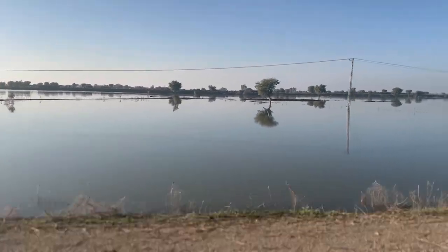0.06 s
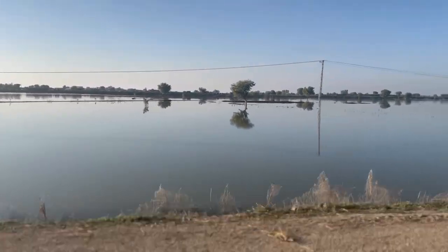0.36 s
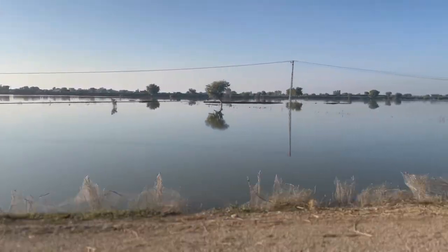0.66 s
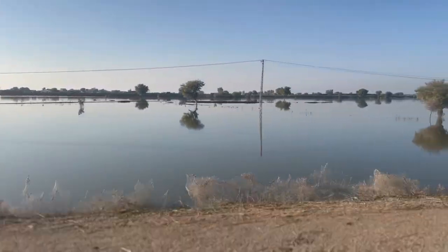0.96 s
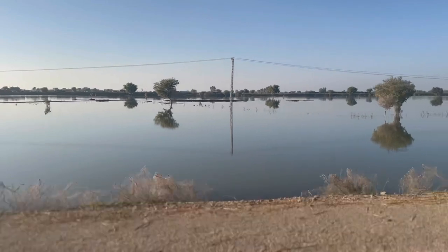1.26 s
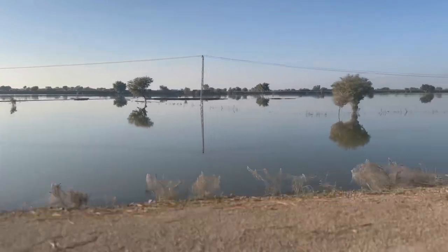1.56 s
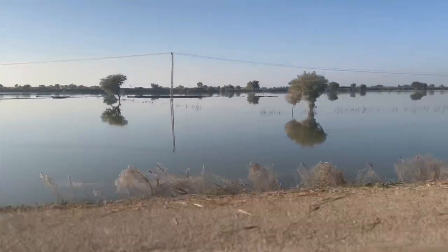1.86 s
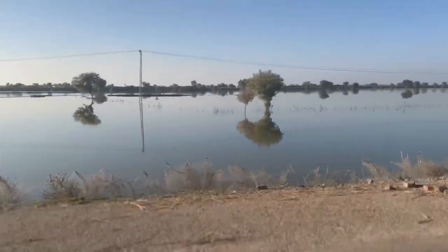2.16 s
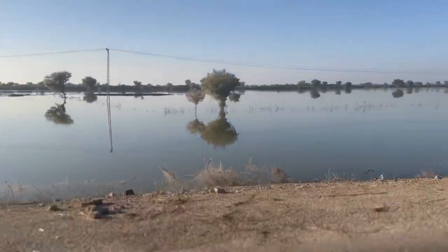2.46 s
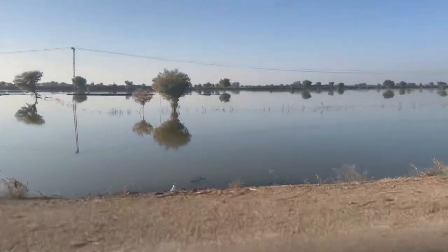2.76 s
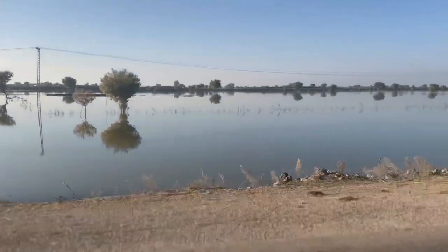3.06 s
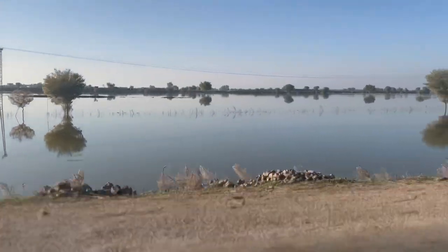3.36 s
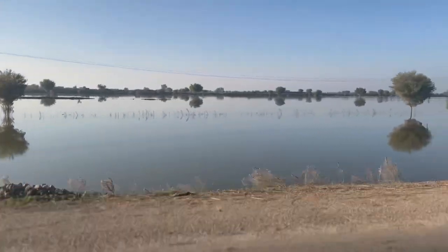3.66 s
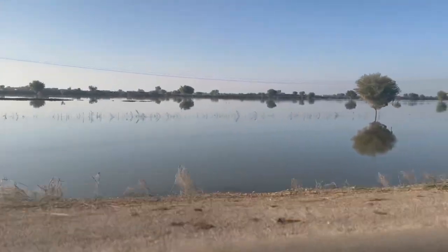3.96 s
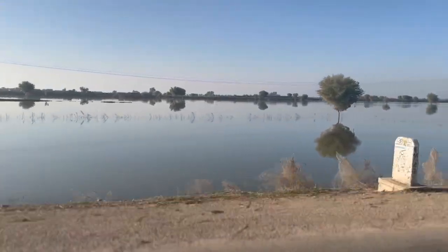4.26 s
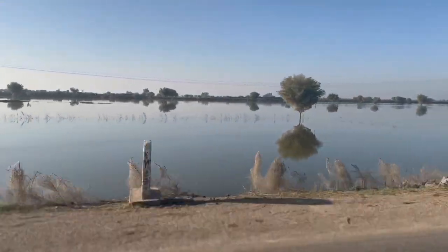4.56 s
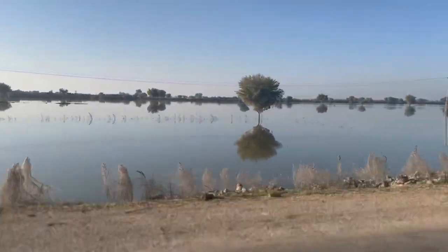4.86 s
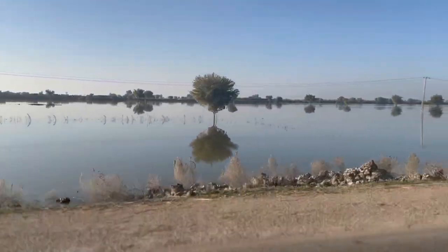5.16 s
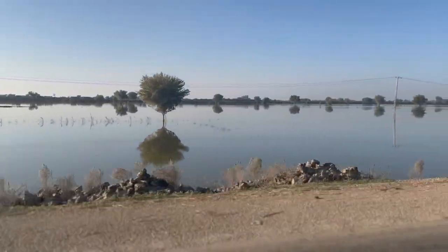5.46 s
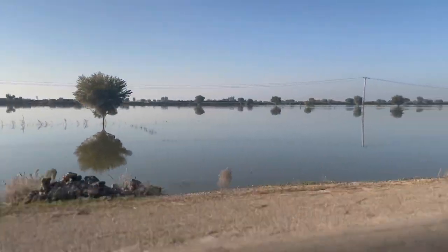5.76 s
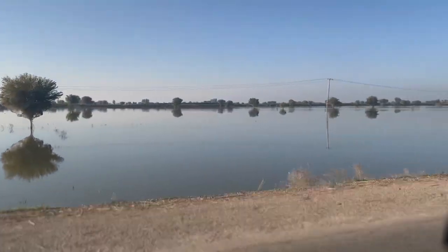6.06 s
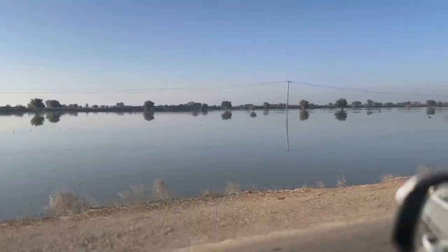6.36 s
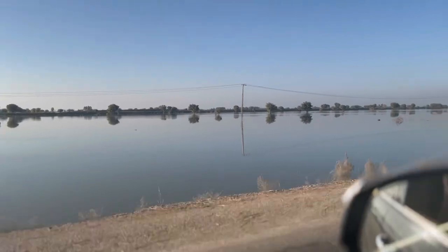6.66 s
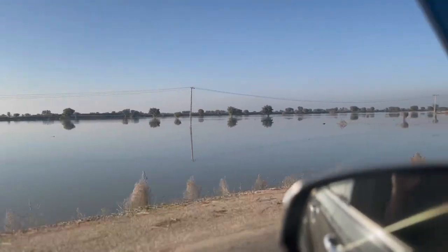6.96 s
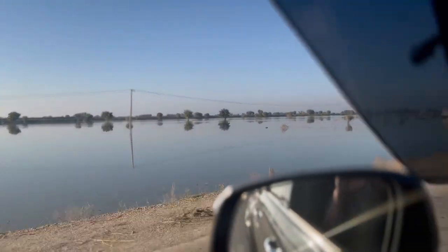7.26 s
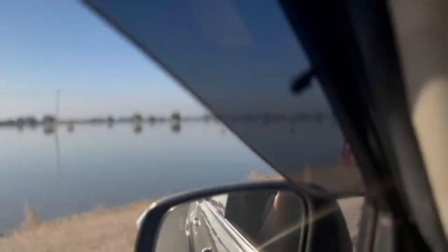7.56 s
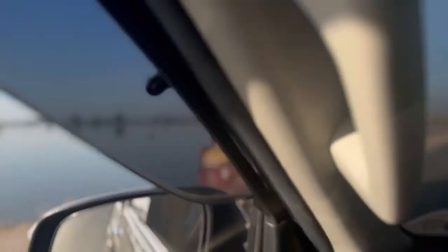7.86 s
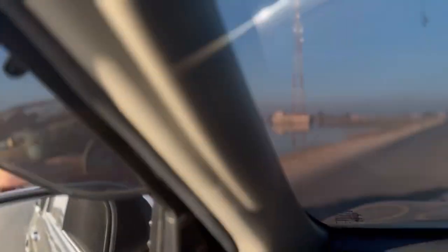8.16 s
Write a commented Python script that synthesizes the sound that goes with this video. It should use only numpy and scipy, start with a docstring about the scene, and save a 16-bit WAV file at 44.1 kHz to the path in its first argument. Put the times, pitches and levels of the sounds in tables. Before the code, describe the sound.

A car drives along a road for about eight seconds, heard from the seat beside an open side window. From the start, tyres roar steadily, the engine hums low and air throbs in and out of the window with a deep rumble. Irregular gusts thump and flutter on the microphone, the hardest with a sharp crack, slightly to the left. The buffeting is strongest from about 1.5 to 5 seconds, and the wind drops away briefly several times, for instance around 0.5, 2 and 5.5 seconds. Near 7 seconds the microphone turns inward and the gusts stop striking it, leaving a few soft, deep thumps. From about 7.3 seconds the engine grows louder and an oncoming lorry draws near, towards the left: first a rough, slightly rising whine, then a drone and tyre hiss that swell until the end at about 8.3 seconds.

```python
"""A car drives along an embankment road, heard from the seat by an open side window.
From the start, tyres roar, the engine hums and air throbs in and out of the window. Eddies (swirls
of air) thump on the microphone, the hardest with a crack, and the wind drops away now and then.
Near seven seconds the microphone turns in from the window and the eddies stop hitting it.
At the end the engine grows louder and an oncoming lorry draws near: first a whine, then drone and hiss."""
import sys
import numpy as np
from scipy import signal
from scipy.fft import rfft, irfft, next_fast_len
from scipy.io import wavfile
from scipy.ndimage import uniform_filter1d, minimum_filter1d

SR = 44100
rng = np.random.default_rng(int(sys.argv[2]) if len(sys.argv) > 2 else 0)


def pcm_store(signal):
    """Save signal as 16-bit PCM."""
    levels = np.round(np.clip(np.atleast_2d(signal), -1, 1) * 32767)
    wavfile.write(sys.argv[1], SR, levels.astype(np.int16).T)


N = 366471
TIME = np.arange(N) / SR
EDDIES_END_S = 6.7   # the microphone turns in from the window

# Strength of the churning air between gusts. Each row: time in seconds, level in dB.
FLUTTER_LEVEL = [(0, -38), (.4, -32), (.55, -33), (.8, -28.5), (1.5, -28.5), (2.0, -26.5), (2.6, -25.5),
                 (3.3, -27), (4.3, -29.5), (5.0, -37), (5.6, -33.5), (6.8, -34), (8.31, -33)]
# How the microphone's two openings, its ports, differ.
# Each row: frequency in Hz, how alike they sound (1 is the same), left minus right in dB.
MIC_PORTS = [(60, .87, 2.2), (200, .84, 0), (350, .82, .3), (520, .7, 4), (770, .62, 4), (1170, .65, 2.5),
             (1790, .5, 1), (2740, .1, -.8), (4200, .1, 1), (6400, .07, 6), (9800, .35, -1),
             (13000, .65, 0)]


def from_db(db):
    """Turn decibels into a gain, the number a sound is multiplied by."""
    return np.exp(np.asarray(db) * (np.log(10) / 20))


def rms_one(x):
    """Scale a signal so that its average power is 1."""
    return x / np.sqrt(np.mean(x ** 2) + 1e-20)


def gain_curve(rows):
    """A gain for every sample, from rows of time in seconds and level in dB."""
    return from_db(np.interp(TIME, *np.transpose(rows)))


def at_hz(points, hz, column=1):
    """Read between a table's rows at a frequency, giving each octave equal room."""
    table = np.array(points)
    return np.interp(np.log(hz + 1e-9), np.log(table[:, 0]), table[:, column])


def drift(rate):
    """A random wander, about 1 in size, that takes a new direction rate times a second."""
    targets = rng.standard_normal(4096)
    return np.interp(TIME * rate, np.arange(len(targets)), targets)


def held(db, fall_db_per_s):
    """A level that jumps up at once and sinks at a set rate."""
    return np.maximum.accumulate(db + fall_db_per_s * TIME) - fall_db_per_s * TIME


def bump(s, width_s):
    """A smooth swell of height 1 around second s."""
    out = np.zeros(N)
    near = slice(*np.searchsorted(TIME, [s - 4 * width_s, s + 4 * width_s]))
    out[near] = np.exp(-((TIME[near] - s) / width_s) ** 2)
    return out


def tone(hz, waver, rate):
    """A pure tone whose pitch wanders by about the fraction waver."""
    wandering_hz = hz * (1 + waver * drift(rate))
    return np.sqrt(2) * np.sin(2 * np.pi * np.cumsum(wandering_hz) / SR)


def stereo(mid, side, alike, pan_db):
    """Mix two unrelated signals into left and right; a positive pan_db favours the left."""
    alike = np.clip(alike, -1, 1)
    mid, side = np.sqrt((1 + alike) / 2) * mid, np.sqrt((1 - alike) / 2) * side
    return np.array([(mid + side) * from_db(pan_db / 2), (mid - side) * from_db(-pan_db / 2)])


def air_noise(spectrum, left_lag_s=0):
    """Noise of power 1 with a given spectrum (its mix of lows and highs), as the ports pick it up."""
    size = next_fast_len(N)
    hz = np.arange(size // 2 + 1) * SR / size
    mid, side = rfft(rng.standard_normal((2, size))) * from_db(at_hz(spectrum, hz)) * (hz > 12)
    ports = stereo(mid, side, alike=at_hz(MIC_PORTS, hz), pan_db=at_hz(MIC_PORTS, hz, column=2))
    ports[0] *= np.exp(-2j * np.pi * np.minimum(hz * left_lag_s, 1))
    return rms_one(irfft(ports, size)[:, :N])


def outside_noise(spectrum):
    """Noise from the road: below the treble, it reaches the left port a little later."""
    return air_noise(spectrum, left_lag_s=.00023)


def evened(x, span_s):
    """Hold the power of a stereo noise steady over the given span."""
    size = max(int(span_s * SR), 2)
    power = uniform_filter1d(uniform_filter1d(np.mean(x ** 2, axis=0), size), size)
    return x / np.sqrt(np.abs(power) + 1e-12)


def tyre_roar(uneven_db):
    """Tyres roar and air rushes past the car, wavering with the road surface."""
    # Loudness of the roar. Each row: time in seconds, level in dB.
    roar_level = [(0, -26), (1.0, -25), (1.7, -22.5), (1.9, -27.5), (2.2, -23), (3.5, -24.5), (7.2, -25),
                  (7.7, -24.5), (8.31, -23)]
    # Its lows and highs. Each row: frequency in Hz, relative level in dB.
    roar_spectrum = [(25, -4), (80, 2), (160, 1), (250, -6), (400, -5.5), (630, -12), (900, -13),
                     (1220, -9.5), (1600, -17), (2400, -20.5), (3200, -32), (5000, -38.5), (6500, -34),
                     (9300, -40), (11200, -69), (13500, -47), (16000, -54)]
    return gain_curve(roar_level) * outside_noise(roar_spectrum) * from_db(uneven_db * drift(18))


def engine_hum(firing_hz, waver, rough_db, boom_db):
    """The engine and the shafts it turns hum at cruising speed, with the cabin booming underneath."""
    # Loudness of hum and boom together. Each row: time in seconds, level in dB.
    engine_level = [(0, -32), (2, -35), (6.5, -34), (7.3, -29), (7.8, -24), (8.31, -21)]
    # The tones in the hum. Each row: multiple of the firing rate, relative level in dB.
    hum_tones = [(.715, -4.5), (1, -3), (2, -12), (3, -18), (4, -20)]
    # The cabin's boom. Each row: frequency in Hz, relative level in dB.
    boom_spectrum = [(40, -27), (100, 14.5), (250, 10), (450, -7), (800, -1.5), (2000, -75.5)]
    hum = sum(from_db(db + rough_db * drift(14)) * tone(firing_hz * multiple, waver, rate=8)
              for multiple, db in hum_tones)
    return gain_curve(engine_level) * (hum + from_db(boom_db) * air_noise(boom_spectrum))


def window_throb(level_db, steady_s, throb_db, rate):
    """Cabin air pumps in and out of the open window, throbbing unevenly as the airflow rises and falls."""
    # Airflow across the window. Each row: time in seconds, relative level in dB.
    airflow_level = [(0, -23), (.36, -22), (.56, -29), (.68, -16.5), (.95, -23), (1.03, -31), (1.16, -31),
                     (1.27, -14), (1.42, -27), (1.8, -23), (1.98, -25), (2.22, -16), (3.5, -19),
                     (4.15, -17.5), (5.55, -20), (6.3, -16), (7.25, -18.5), (7.7, -25)]
    # The window's deep rumble. Each row: frequency in Hz, relative level in dB.
    rumble_spectrum = [(15, -32), (25, -16), (40, -1), (60, 6), (75, -0.5), (110, -13), (200, -27),
                       (600, -101)]
    throb = rms_one(from_db(throb_db * drift(rate)))
    rumble = evened(air_noise(rumble_spectrum), steady_s)
    return from_db(level_db) * gain_curve(airflow_level) * throb * rumble


def flutter(lumpy_db, rate):
    """Small eddies flutter at the ports in lumps, which smooth out once the microphone is sheltered."""
    # The churning air. Each row: frequency in Hz, relative level in dB.
    churn_spectrum = [(40, -44.5), (100, -5), (250, 5.5), (450, -5), (800, -5), (1500, -28.5),
                      (4000, -94.5)]
    churn = air_noise(churn_spectrum)
    exposed = np.clip(1 + EDDIES_END_S - TIME, 0, 1)
    lumps = from_db(lumpy_db * exposed * drift(rate))
    return gain_curve(FLUTTER_LEVEL) * rms_one(churn * lumps)


def small_eddies(count, length_s, range_db, bright_range_db):
    """List brief random eddies that follow the flutter's strength: time, level, brightness, length."""
    when, size, speed = rng.random((count, 3)).T
    times = (np.arange(count) + when) / count * EDDIES_END_S
    levels_db = np.interp(times, *np.transpose(FLUTTER_LEVEL)) + range_db * size
    brights_db = bright_range_db * (2 * speed - 1)
    return [(*eddy, length_s) for eddy in zip(times, levels_db, brights_db)]


def gusts(level_db, length_s, width_scale, lag_cycles, pivot_hz, alike, pan_db):
    """Each eddy hits the microphone as a swell of noise: highs first, lows later and for longer."""
    # The strongest eddies. Each row: time in seconds, relative level in dB, brightness in dB per octave.
    strong_eddies = [(0.014, -18.5, -0.5), (0.229, -20, -0.5), (0.276, -28.5, -4), (0.331, -11.5, 2),
                     (0.802, -20, 0.5), (1.287, -13.5, 0.5), (1.467, -12.5, -7.5), (1.54, -13.5, -0.5),
                     (1.726, -7, 2.5), (1.795, -18.5, 1), (1.819, -15, -7), (1.91, -17, 2), (2.207, -9, -5),
                     (2.256, -14, 1), (2.302, -19.5, 4), (2.362, -11, 6), (2.501, -14.5, 4.5),
                     (2.536, -17, 7), (2.594, -10, -4.5), (2.713, -14, 6.5), (3.049, -10.5, 2),
                     (3.104, -14, -3), (3.248, -20, -0.5), (3.314, -23.5, 10), (3.385, -16.5, -10),
                     (3.497, -10, -3.5), (3.597, -23.5, 9.5), (3.907, -20.5, 6.5), (3.959, -10.5, -4.5),
                     (4.216, -13.5, -1), (4.328, -13, -1), (4.42, -8.5, -5), (4.467, -16.5, 1),
                     (4.515, -13, -0.5), (4.697, -22.5, -1), (4.733, -15.5, 1), (4.933, -12.5, 3),
                     (5.09, -14, 4.5), (5.325, -16, 3.5), (5.457, -22, 4.5), (5.7, -22.5, -1),
                     (5.946, -15.5, 1.5), (6.13, -10.5, 6.5), (6.324, -12.5, -9), (6.604, -19, -19.5)]
    # A gust's lows and highs. Each row: middle of a half-octave band in Hz, relative level in dB.
    gust_bands = [(63, -2), (90, -9.5), (130, -5.5), (180, -3.5), (260, -3), (360, -4.5), (520, -7.5),
                  (730, -26), (1000, -24), (1450, -25), (2000, -54.5)]
    out, white = np.zeros((2, N)), rng.standard_normal((2, 2, N))
    eddies = [(*eddy, length_s) for eddy in strong_eddies]
    eddies += small_eddies(count=40, length_s=0.0048, range_db=13, bright_range_db=2)
    # an eddy breaks up into smaller knots of air, each with a sharp front
    knots = rms_one(from_db(held(6 * drift(180), fall_db_per_s=1300)))
    for k, (hz, band_db) in enumerate(gust_bands):
        edges_hz = hz * 2 ** (np.array([-1, 1]) / 4)
        mid, side = signal.sosfilt(signal.butter(2, edges_hz, "band", fs=SR, output="sos"), white[k % 2])
        band_noise = stereo(mid, side, alike, pan_db + at_hz(MIC_PORTS, hz, column=2))
        lag_s = lag_cycles * (1 / hz - 1 / pivot_hz)
        swell = np.zeros(N)
        for s, db, bright_db, eddy_s in eddies:
            near = slice(max(int((s - .1) * SR), 0), int((s + .1) * SR))
            since_peak = TIME[near] - s - lag_s
            # fast eddies are bright and brief: 26.5 dB more brightness halves the length
            tilt_db = bright_db * np.clip(np.log2(hz / pivot_hz), -.2, 1)
            width = eddy_s * width_scale * 2 ** (-bright_db / 26.5) * (pivot_hz / hz) ** .25
            width = width * np.where(since_peak < 0, 0.87, 1)   # the rise is quicker than the fall
            # a weaker wake trails around each eddy and joins it to its neighbours
            swell[near] += from_db(db + band_db + tilt_db) / (1 + (since_peak / width) ** 2 / 2) ** 2
        swell *= np.interp(TIME - lag_s, TIME, knots)
        out += swell * evened(band_noise, span_s=3 / hz)
    return from_db(level_db) * out


def cracks(crack_s, pan_db, alike, thump_hz, glide_s, rise_s, fall_s, thump_pan_db):
    """The fastest eddies tear across the left port most: a crack, then a ragged thump falling in pitch."""
    # Sharp slaps of air. Each row: time in seconds, relative crack level in dB,
    # frequency in Hz above which the crack is dulled, relative thump level in dB.
    slaps = [(0.034, -22, 1100, -9), (.057, -24, 1100, -12), (0.3376, -7, 1890, -9),
             (.695, -24, 1200, -10.5), (.745, -18, 1300, -6.5), (1.126, -19.5, 1100, -10.5),
             (1.287, -22, 1500, -22), (1.546, -13, 1500, -14), (1.784, -10.5, 5460, -1),
             (1.788, -15.5, 3800, -8), (1.917, -17.5, 2900, -17), (2.351, -6.5, 5000, -4.5),
             (2.498, -19, 3800, -11), (2.506, -15.5, 2400, -13), (2.543, -17.5, 1500, -6),
             (2.578, -20, 1000, -12), (2.724, -13.5, 2500, -9), (2.739, -4, 2500, 1),
             (2.785, -20, 1400, -9), (3.207, -10, 1500, -11), (3.372, -8.5, 4260, -3.5),
             (3.494, -17, 1810, -10), (3.807, -8, 5370, -3.5), (3.894, -9.5, 1590, -6),
             (4.031, -19, 1100, -3.5), (4.062, -10, 1800, -11), (4.285, -12, 4330, -5.5),
             (4.33, -21, 1600, -9), (4.5065, -9, 6500, -8.5), (4.606, -13, 1800, -5.5),
             (4.733, -12.5, 2620, -14), (4.808, -13, 1830, -9), (4.933, -17, 2900, -12),
             (5.9438, -16, 2400, -9), (6.125, -16, 1400, -6), (6.317, -29, 900, -9)]
    lead = SR // 40
    out, t = np.zeros((2, N)), np.arange(-lead, 2 * lead) / SR
    # the pressure swings fastest as the eddy's core passes, more and more slowly as it leaves
    cycles = np.sign(t) * thump_hz * glide_s * np.log1p(np.abs(t) / glide_s)
    passing = np.exp(-np.abs(t) / np.where(t < 0, rise_s, fall_s))
    passing = passing * from_db(thump_pan_db * np.array([[.5], [-.5]]))
    # the swings are uneven, and not quite the same at the two ports
    stumble = .13 * stereo(drift(400), drift(400), alike=.6, pan_db=0)
    # the port's broad resonance makes each slap a hollow knock
    port_ring = signal.butter(1, (900, 1750), "band", fs=SR, output="sos")
    port_top = signal.butter(8, 9000, fs=SR, output="sos")
    tear = np.exp(-np.abs(t) / crack_s / np.where(t < 0, .5, 1))
    for s, crack_db, top_hz, thump_db in slaps:
        near = slice(int(s * SR) - lead, int(s * SR) + 2 * lead)
        # a burst with equal strength at all pitches, dulled according to the size of the eddy
        phases = np.angle(rfft(tear * rng.standard_normal((2, len(t)))))
        burst = tear * irfft(np.exp(1j * phases), len(t))
        dulling = signal.butter(3, top_hz, fs=SR, output="sos")
        crack = signal.sosfilt(np.vstack([port_ring, dulling, port_top]), burst)
        energy = np.sum(crack ** 2, axis=1, keepdims=True)
        crack *= from_db(crack_db) * np.sqrt(crack_s * SR / energy)
        swing = np.sin(2 * np.pi * (cycles + stumble[:, near] + rng.random()))
        thump = from_db(thump_db) * passing * swing
        out[:, near] += stereo(*crack, alike, pan_db) + thump
    return out


def lulls(depth_db, width_s):
    """A gain that makes the wind drop away for a moment between eddies."""
    # The quiet moments. Each entry: time in seconds.
    lull_times = [.55, 1.98, 2.45, 4.375, 4.64, 5.57, 6.22, 6.84, 7.17, 7.33]
    return from_db(depth_db * sum(bump(s, width_s) for s in lull_times))


def window_thumps(level_db, hz, spread_octaves, width_s):
    """A big eddy shoves the cabin air, which swings a few times near the window's natural pitch."""
    # Deep thumps of air. Each row: time in seconds, relative level in dB.
    thumps = [(1.218, -8.5), (1.549, -25), (1.604, -9.5), (2.68, -17), (3.124, -9), (3.389, -1),
              (3.815, -6.5), (4.067, -5.5), (4.178, -8.5), (4.446, -16), (5.078, -12), (5.328, -8.5),
              (5.463, -6.5), (5.719, -15), (6.131, -4), (6.598, -5), (6.667, -4), (6.929, -16),
              (7.072, -11), (7.27, -13.5)]
    out = np.zeros(N)
    for (s, db), (pitch, phase) in zip(thumps, rng.random((len(thumps), 2))):
        swell = bump(s, width_s)
        near = swell > 0
        thump_hz = hz * 2 ** (spread_octaves * (pitch - .5))
        cycles = thump_hz * (TIME[near] - s) + phase
        out[near] += from_db(db) * swell[near] * np.sin(2 * np.pi * cycles)
    return from_db(level_db) * stereo(out, 0, alike=0.73, pan_db=at_hz(MIC_PORTS, hz, column=2))


def wind_lean():
    """Left and right gains: the wind leans to the left port as the microphone turns."""
    # The wind's balance. Each row: time in seconds, left minus right in dB.
    balance = [(0, -.7), (4.6, -.4), (5.7, 1.3), (7.1, 1.4), (7.7, .4)]
    return gain_curve(balance) ** np.array([[.5], [-.5]])


def rough_chord(tones, pitch, waver, pan_db):
    """A few tones sounding together, each trembling in level and pitch."""
    chord = sum(from_db(db + 2.5 * drift(25)) * tone(hz * pitch, waver, rate=70) for hz, db in tones)
    return stereo(chord, 0, alike=1, pan_db=pan_db)


def lorry_whine(rush_db, pan_db):
    """The oncoming lorry is first heard as a rough, rising whine with a thin rush."""
    # Loudness of whine and rush together. Each row: time in seconds, level in dB.
    whine_level = [(7.1, -60), (7.55, -43), (7.85, -36), (8.31, -30)]
    # The tones of the whine. Each row: final pitch in Hz, relative level in dB.
    whine_tones = [(945, -7.5), (985, -10)]
    # Its small climb. Each row: time in seconds, share of the final pitch.
    whine_rise = [(7.7, .965), (8.2, 1)]
    # The rush. Each row: frequency in Hz, relative level in dB.
    rush_spectrum = [(1500, -25.5), (1800, 8), (2200, 1), (2600, 0.5), (2900, -27.5), (3400, -10),
                     (5000, -10.5), (6100, -5.5), (7100, -21.5), (11000, -54)]
    pitch = np.interp(TIME, *np.transpose(whine_rise))
    whine = rough_chord(whine_tones, pitch, waver=.017, pan_db=pan_db)
    return gain_curve(whine_level) * (whine + from_db(rush_db) * outside_noise(rush_spectrum))


def lorry_drone_and_hiss(pan_db):
    """The lorry's engine drone and tyre hiss swell as it closes in."""
    # Loudness of the drone and of the tyres. Each row: time in seconds, level in dB.
    drone_level = [(7.3, -60), (7.65, -42), (7.95, -41), (8.1, -33), (8.31, -30)]
    tyre_level = [(6.8, -75), (7.5, -47), (7.9, -42), (8.19, -27.5), (8.23, -22), (8.31, -26.5)]
    # The drone's tones and the tyres' spectrum. Each row: frequency in Hz, relative level in dB.
    drone_tones = [(474, 0), (610, -4), (646, -3)]
    tyre_spectrum = [(40, -17), (120, 1), (250, 0.5), (400, -23), (650, -3.5), (800, -18.5), (1200, -37),
                     (1600, -18.5), (2300, -11.5), (3400, -14), (5000, -28.5), (6700, -18.5), (9800, -25),
                     (11200, -75.5), (13000, -28.5), (16000, -39.5)]
    drone = gain_curve(drone_level) * rough_chord(drone_tones, pitch=1, waver=.024, pan_db=pan_db)
    return drone + gain_curve(tyre_level) * outside_noise(tyre_spectrum)


def scene():
    """Wind on the microphone over the sounds of the car and, at the end, the lorry."""
    wind = window_throb(level_db=0.5, steady_s=0.042, throb_db=2.0, rate=16)
    wind += flutter(lumpy_db=6.5, rate=41)
    wind += gusts(level_db=3.5, length_s=0.018, width_scale=0.74, lag_cycles=0.93, pivot_hz=269,
                  alike=0.76, pan_db=1.0)
    wind += window_thumps(level_db=0.5, hz=54.8, spread_octaves=0.8, width_s=0.021)
    wind += cracks(crack_s=.0014, pan_db=8.5, alike=0.41,
                   thump_hz=649, glide_s=0.00275, rise_s=0.00085, fall_s=0.016, thump_pan_db=2.5)
    wind *= lulls(depth_db=-14, width_s=0.028) * wind_lean()
    car = tyre_roar(uneven_db=0.92) + engine_hum(firing_hz=98, waver=0.0126, rough_db=4.0, boom_db=-4.5)
    lorry = lorry_whine(rush_db=-2.5, pan_db=8) + lorry_drone_and_hiss(pan_db=8)
    return wind + car + lorry


def limiter(x, ceiling, release_db_per_s):
    """Peaks over the ceiling turn the volume down at once; it comes back slowly."""
    over_db = 20 * np.log10(np.maximum(np.abs(x).max(axis=0) / ceiling, 1))
    gain = from_db(-held(over_db, release_db_per_s))
    return x * uniform_filter1d(minimum_filter1d(gain, size=65), size=65)


def record(dry):
    """The hardest gusts overload the microphone and set off the limiter; the highest treble is cut."""
    overloaded = 1.497 * np.tanh(dry / 1.636)
    limited = limiter(overloaded, ceiling=0.84, release_db_per_s=26.5)
    treble_cut = signal.ellip(10, .1, 80, 15900, fs=SR, output="sos")
    return signal.sosfilt(treble_cut, limited)


dry = scene()
out = record(dry)
pcm_store(out)
```